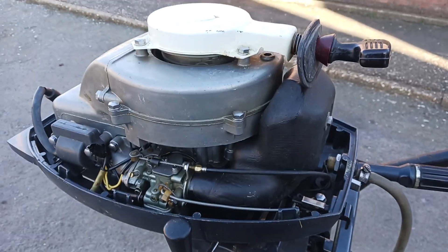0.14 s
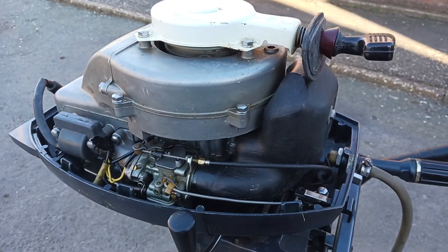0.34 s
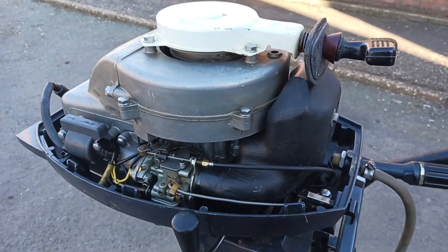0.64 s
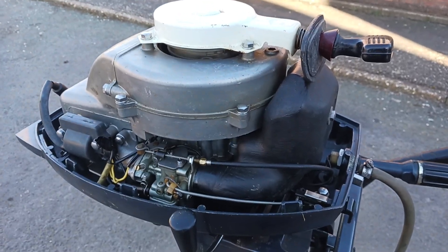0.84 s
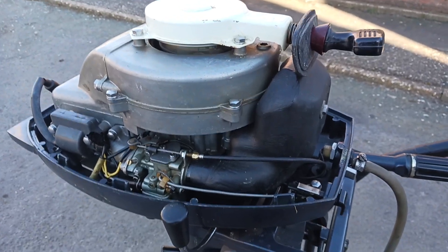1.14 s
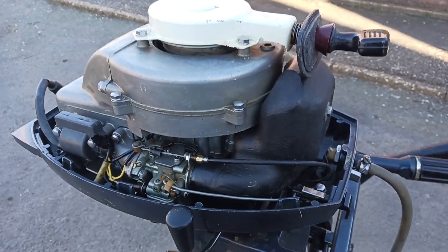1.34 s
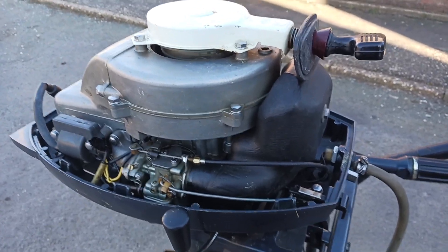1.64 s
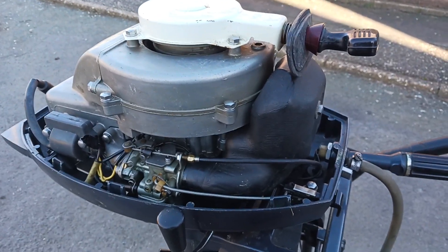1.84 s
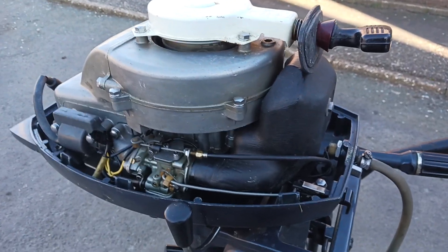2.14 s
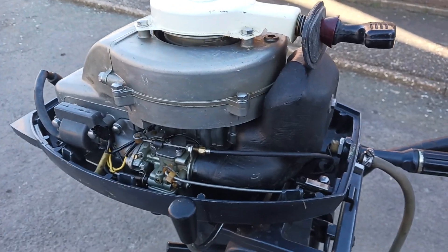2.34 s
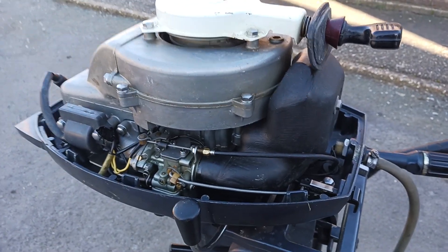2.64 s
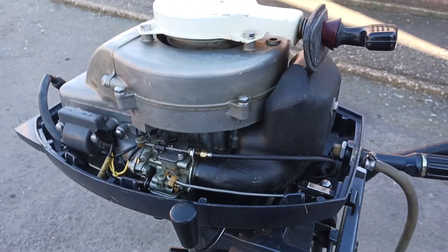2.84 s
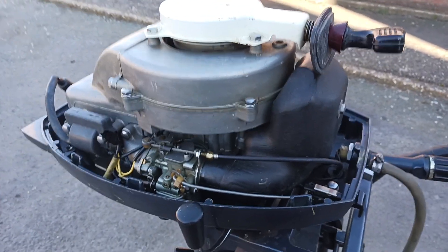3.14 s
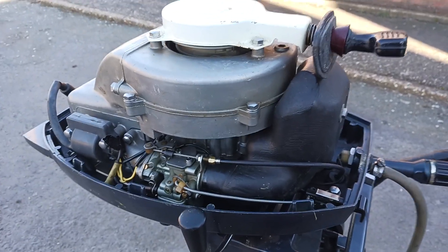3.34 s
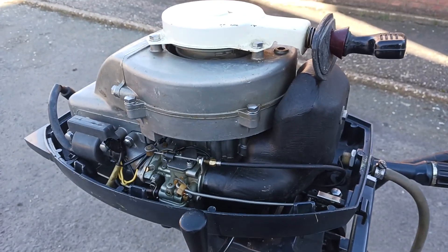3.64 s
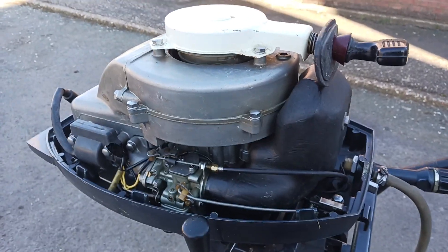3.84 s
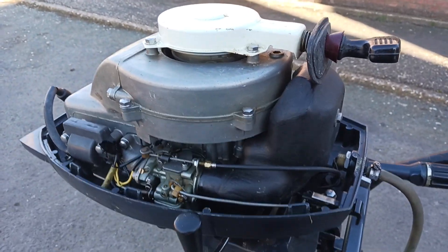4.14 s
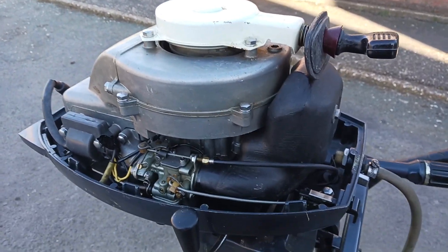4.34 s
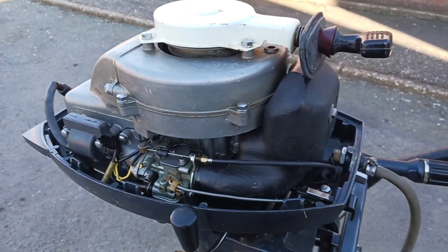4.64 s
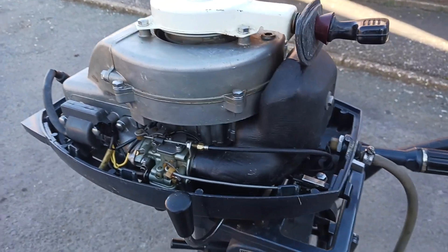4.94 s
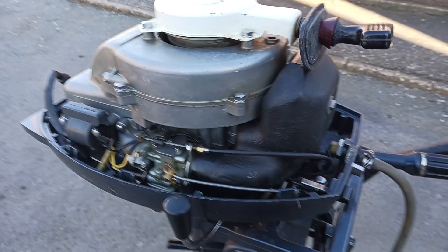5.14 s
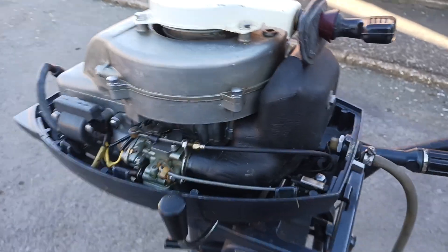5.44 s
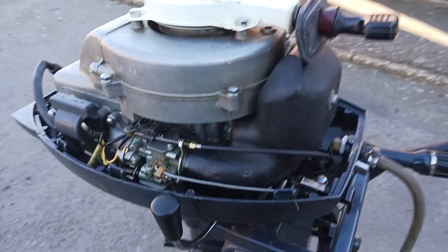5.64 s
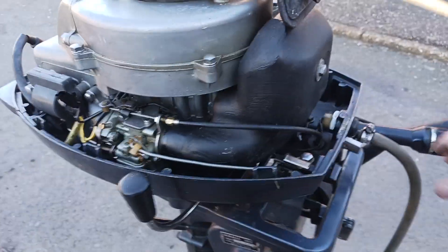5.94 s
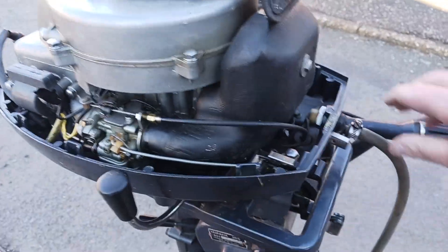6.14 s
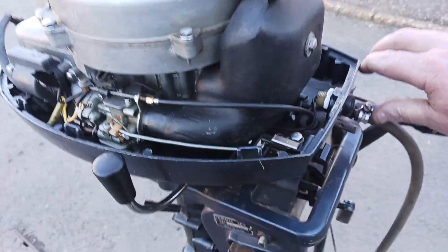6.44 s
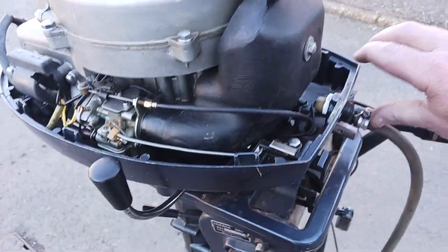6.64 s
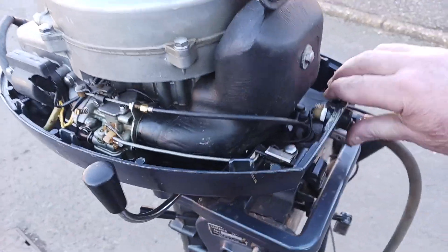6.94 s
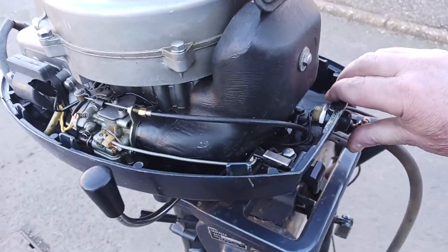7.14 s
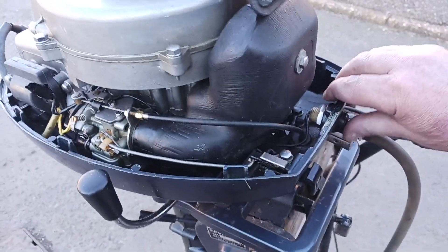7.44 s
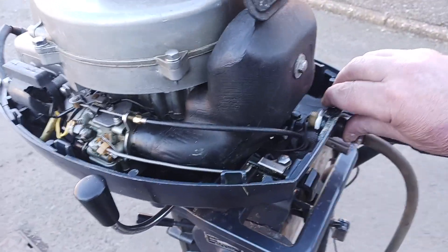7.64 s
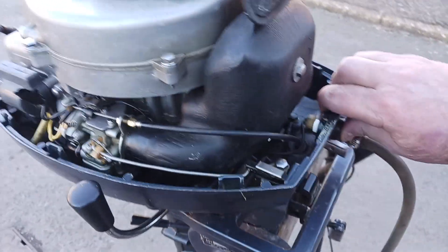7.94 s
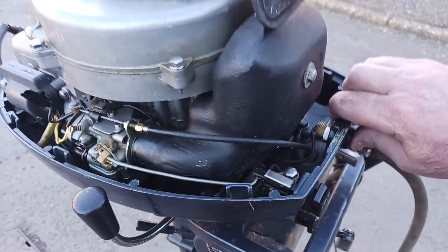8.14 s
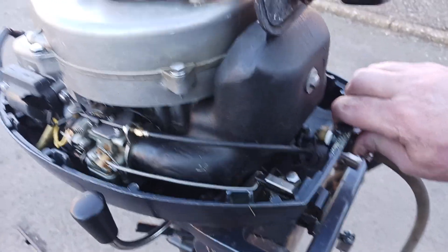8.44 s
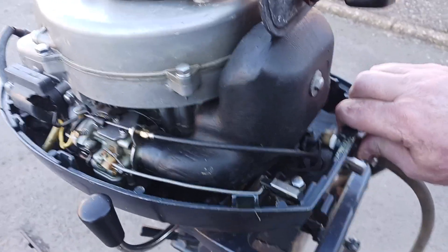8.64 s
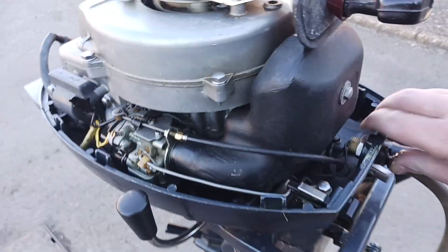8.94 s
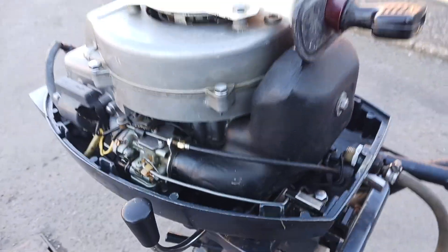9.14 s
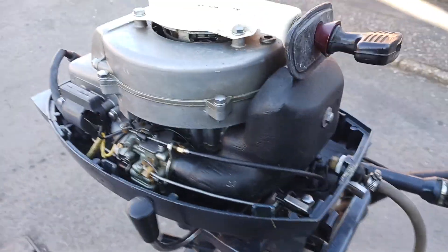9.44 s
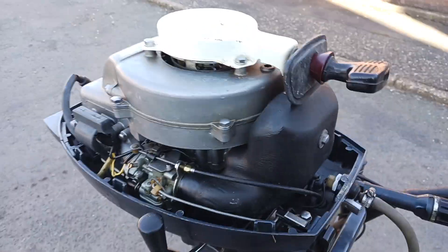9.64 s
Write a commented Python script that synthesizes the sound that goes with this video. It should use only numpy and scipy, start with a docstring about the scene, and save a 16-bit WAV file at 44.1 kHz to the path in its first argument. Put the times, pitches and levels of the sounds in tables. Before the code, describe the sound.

A small uncovered outboard motor idles unevenly with sharp, stuttering barks over thudding and metallic whirr, then stops, coasting down to knocks and buffeting wind.

```python
"""Two-stroke outboard idling and stopping

A small single-cylinder outboard with its cover off turns about 35 times a second on a stand outdoors.
It fires mostly every four to six turns, at times stuttering: ringing modes and noise bursts make sharp
barks over a thudding intake (pressure pulses locked to the crank) and a metallic whirr (resonant noise).
The microphone moves closer, the motor is stopped and coasts down with a few last knocks;
wind noise and short pops then buffet the left port."""
import sys
import numpy as np
from scipy import signal
from scipy.fft import rfft, irfft
from scipy.io import wavfile
from scipy.ndimage import uniform_filter1d

SR = 44100
rng = np.random.default_rng(int(sys.argv[2]) if len(sys.argv) > 2 else 0)


def file_out(sig):
    """Save sig as 16-bit WAV at sys.argv[1]."""
    # one column per channel
    cols = np.atleast_2d(sig).T
    # limit, then scale
    lim = np.clip(cols, -1, 1)
    pcm = np.round(lim * 32767).astype(np.int16)
    wavfile.write(sys.argv[1], SR, pcm)


N = 431296
TIME_S = np.arange(N) / SR
BINS_HZ = np.maximum(np.arange(N // 2 + 1) * SR / N, 1)

# full firings: start_s, crack_db
FIRINGS = [(0.11, -10.5), (0.2503, -13.5), (0.3904, -15.5), (0.5342, -17), (0.6466, -18.5), (0.8157, -23),
           (0.9585, -16.5), (1.1014, -14.5), (1.2451, -12.5), (1.3573, -24), (1.4726, -15.5),
           (1.5878, -16.5), (1.6441, -19), (1.7566, -14.5), (1.8997, -17), (2.013, -15.5), (2.1273, -14),
           (2.2707, -16), (2.4112, -15), (2.526, -22), (2.6965, -14.5), (2.8346, -18), (2.9466, -19),
           (3.1167, -19), (3.2609, -14), (3.4037, -12.5), (3.5196, -15), (3.6076, -18.5), (3.7839, -13),
           (3.924, -15.5), (4.0421, -14), (4.2147, -14), (4.3582, -15.5), (4.4997, -14), (4.6459, -10),
           (4.788, -18.5), (4.9024, -11), (5.0424, -21), (5.1834, -13.5), (5.3253, -18.5), (5.469, -14),
           (5.6435, -18), (5.7882, -18), (5.904, -16.5), (6.0224, -19), (6.1685, -14), (6.2861, -18),
           (6.4287, -10.5), (6.5452, -12.5), (6.6877, -16.5), (6.86, -22), (7.0029, -17), (7.1714, -21.5),
           (7.3169, -15), (7.464, -16.5), (7.6076, -12.5), (7.7235, -16.5), (7.8407, -15.5), (7.9572, -16)]
# partial burns in a turn next to a full firing, dull with little crack: start_s, bark_db
STUTTERS = [(.7885, -16.5), (.929, -18.5), (1.273, -20.5), (1.985, -17), (2.241, -19.5), (2.383, -17.5),
            (2.5554, -16), (2.6667, -22.5), (4.386, -21.5), (4.928, -18.5), (5.154, -20), (5.351, -24.5),
            (6.256, -20.5), (7.143, -16)]
# crank speed after the last firing: time_s, turns_per_s
COAST = [(7.96, 35), (8.09, 32), (8.19, 28.3), (8.31, 23.2), (8.46, 17.3), (8.6, 11.3), (8.7, 8.4),
         (8.85, 4), (8.95, 0)]
# nearness of the microphone: time_s, closeness_0_to_1
CLOSENESS = [(0, 0.31), (4.4, 0.33), (5.4, 0.55), (6.2, 0.87), (9.7, 0.8)]
# exhaust and casing modes rung by a firing: pitch_hz, relative_db, t60_s, left_minus_right_db
BARK_MODES = [(66.4, -41.5, 0.35, 3), (165.8, -20.5, 0.055, -5.5), (245, -33.5, 0.0063, -7.5),
              (448.3, -14.5, 0.042, -1), (527, -15, 0.023, -11), (573.6, -33, 0.22, 0),
              (738, -18, 0.2, -2.5), (850, -12.5, .003, 0), (1011, -24, 0.087, 7.5),
              (1247, -24, 0.055, 14.5), (1396, -16, 0.058, -1.5), (1683, -13, 0.045, 7),
              (2175, -42, .03, -3.5), (2901, -27, 0.054, 32), (4103, -18, 0.018, 8)]
# casing resonances from above and from close by: centre_hz, width_hz (before spread), relative_db
CASING_ABOVE = [(1231, 8.8, -2.5), (1853, 400, 0), (2126, 85, 0), (2673, 290, -5.5), (3230, 40, -7.5),
                (3426, 23, -5), (3790, 280, -13), (6170, 330, -21.5), (6720, 100, -21.5), (7220, 240, -27)]
CASING_CLOSE = [(946, 44, -11.5), (1489, 100, 4), (1888, 206, -1.5), (2160, 90, 1.5), (2563, 130, -6.5),
                (3896, 140, -13), (4160, 135, -19), (7250, 130, -23)]
# relative spectra of churned air, running hiss, exhaust blast and rubbing: freq_hz, density_db_per_hz
CHURN = [(30, -31), (60, -3), (110, -3.5), (240, -1.5), (340, -7), (450, -1), (600, -4), (830, -11),
         (1200, -4), (1800, -6), (3000, -5.5), (4500, -26), (6500, -50.5)]
HISS = [(1500, -19.5), (3000, -14), (4300, 9.5), (5400, -2.5), (7400, -3.5), (9000, -7.5), (10300, -10),
        (12000, -4), (13500, -9), (16000, -8.5)]
BLAST = [(600, 4.5), (1500, 6.5), (3000, -31.5), (4300, -2.5), (5400, -1.5), (7500, -4), (10000, -8),
         (12700, -5), (16000, -6.5)]
RUBBING = [(40, -18), (300, -2.5), (500, -2), (700, 1), (1050, -3.5), (1500, -15.5), (5000, -36),
           (9500, -38.5), (12000, -21.5), (16000, -22.5)]
# relative spectra of steady wind, a buffet and the quiet yard: freq_hz, density_db_per_hz
WIND = [(20, -11), (60, 6), (130, -1), (250, -8), (450, -22), (800, -41.5), (1500, -47), (3000, -65),
        (8000, -77)]
BUFFET = [(20, -8.5), (60, 3.5), (150, -1), (400, -0.5), (600, -7.5), (900, -22), (1600, -35), (2300, -50),
          (3200, -65), (8000, -69)]
OUTDOORS = [(40, -12), (120, 5.5), (280, -20), (520, -19), (1100, -21), (2400, -24), (3200, -42),
            (6000, -33.5), (15000, -43)]
# level balance of the two microphone ports: freq_hz, left_minus_right_db
PORT_BALANCE = [(60, 4.5), (110, -3.5), (200, -2), (380, -1), (700, 1), (1290, 4.5), (2380, 7.5), (4400, 6),
                (8120, 9.5), (15000, 10.5)]
# phase between the ports: freq_hz, left_lead_rad
PORT_PHASE = [(50, 0.87), (400, 0.45), (1120, 1.82), (1500, 1.76), (2070, 0.5), (2410, 0.52), (3000, 4.97),
              (3800, 5.32), (5000, 1.4), (16000, 1.2)]
# correlation of the ports: freq_hz, likeness_0_to_1
PORT_LIKENESS = [(40, .4), (150, .93), (700, .94), (2000, .9), (5000, .45), (16000, .35)]
# knocks as the crank rocks to rest: start_s, ring_db, body_db, edge_db
KNOCKS = [(8.613, -27, -33, -48), (8.718, -33, -40, -54), (8.781, -38, -48, -53), (8.86, -30.5, -33, -44),
          (8.973, -39.5, -51, -74), (9.066, -53, -61, -90)]
# faint thin ticks of very high noise: start_s, level_db
TICKS = [(8.275, -38), (8.333, -43), (8.411, -40), (8.473, -45), (9.546, -55)]
# gusts on the ports: crest_s, half_length_s, left_db, right_db
GUSTS = [(1.147, 0.08, -37, -23), (1.55, 0.25, -30, -30), (1.664, .04, -39, -29), (1.858, 0.025, -40, -20),
         (2.003, .035, -33.5, -17.5), (2.113, 0.036, -45, -23), (2.5, .25, -45, -36),
         (8.515, 0.28, -31.5, -39), (8.963, .05, -29, -47), (9.154, .07, -28, -60.5),
         (9.31, 0.032, -24, -49), (9.498, .11, -19.5, -45.5), (9.75, .08, -49.5, -39)]
# single buffets on the left port: start_s, relative_db
BUFFETS = [(9.094, -32.5), (9.142, -28), (9.189, -34), (9.209, -30.5), (9.264, -20), (9.326, -20.5),
           (9.388, -14.5), (9.413, -10.5), (9.464, -7.5), (9.541, -9.5), (9.554, -12), (9.586, -15.5)]

IDLE_TURNS_PER_S = 35
LAST_FIRING_S = FIRINGS[-1][0]
# bark of a usual firing; share of the crack's swing in dB that it follows
USUAL_CRACK_DB, BARK_DB, BARK_FOLLOWS = -14, -16.5, 0.25
# a wait this long begins with an afterburn, one turn after the firing, that fouls the cylinder
FOULED_WAIT_TURNS = 6
AFTERBURN_DB, AFTERBURN_SCATTER_DB = -18, 0.5
PARTIAL_CRACK_DB = -9  # stutter or afterburn, relative to its bark
# base levels at idle and the power of crank speed each follows
WHIRR_DB, WHIRR_POWER = -18.5, 1.79
HISS_DB, HISS_POWER = -34, 1.54
PUMPING_DB, PUMPING_POWER = -18.5, 0.32
DRAG_DB, DRAG_POWER = -23.5, 1.42
# once nothing fires, the slack drive rattles a little louder
OVERRUN_DB, OVERRUN_RISE_S = 1, 0.091
STILL_AIR_DB, OUTDOORS_DB = -56.5, -58.5
CUTOFF_HZ = 16000


def from_db(db):
    """Decibels to gain."""
    return 10 ** (np.asarray(db) / 20)


def rms_one(x):
    """Scale to rms 1."""
    return x / np.sqrt(np.mean(x ** 2) + 1e-20)


def in_time(curve):
    """A (time_s, value) curve at every sample."""
    time_s, value = np.transpose(curve)
    return np.interp(TIME_S, time_s, value)


def per_bin(points):
    """A table over log frequency at every bin."""
    hz, value = np.transpose(points)
    return np.interp(np.log(BINS_HZ), np.log(hz), value)


def spectrum(points):
    """Gain at every bin from a table in dB."""
    return from_db(per_bin(points))


def clicks(times_s, sizes):
    """One impulse at each time."""
    samples = np.clip(np.round(times_s * SR).astype(int), 0, N - 1)
    return np.bincount(samples, sizes, N) + 1e-18


def delayed(x, delay_s):
    """The same sound, later."""
    return np.interp(TIME_S - delay_s, TIME_S, x, left=0)


def ring(x, hz, t60_s):
    """Two-pole resonator: a unit click rings a decaying sine that starts at height 1."""
    radius = from_db(-60 / (t60_s * SR))
    step_rad = 2 * np.pi * hz / SR
    feedback = [1, -2 * radius * np.cos(step_rad), radius ** 2]
    return signal.lfilter([0, np.sin(step_rad)], feedback, x)


def fading(x, t60_s):
    """Each click becomes an exponential decay."""
    return signal.lfilter([1], [1, -from_db(-60 / (t60_s * SR))], x)


def noise(gain, drive=1):
    """Mono noise, scaled by drive, then coloured by gain; rms 1 at drive 1."""
    return irfft(rfft(rng.standard_normal(N) * drive) * rms_one(gain), N)


def at_ports(gain, drive=1):
    """Turbulence scaled by drive and coloured by gain, partly shared by the two ports; rms 1."""
    shared, own = rfft(rng.standard_normal((2, N)) * drive)
    alike = np.clip(per_bin(PORT_LIKENESS), 0, 1)
    lean = from_db(per_bin(PORT_BALANCE) / 2)
    right = alike * shared + np.sqrt(1 - alike ** 2) * own
    right = right * np.exp(-1j * per_bin(PORT_PHASE))
    return rms_one(irfft(np.array([shared * lean, right / lean]) * gain, N))


def resonances(peaks, spread):
    """Gain of steep-sided resonances summed in power."""
    power = 0
    for hz, width_hz, db in peaks:
        offset = (BINS_HZ - hz) / (spread * width_hz)
        power = power + from_db(db) ** 2 / (1 + offset ** 2) ** 2
    return np.sqrt(power)


def crank_turns():
    """Crank angle in turns: whole turns lie between firings, then the flywheel coasts."""
    fired_s = np.array(FIRINGS)[:, 0]
    whole = np.concatenate([[0], np.cumsum(np.round(np.diff(fired_s) * IDLE_TURNS_PER_S))])
    before = np.minimum(TIME_S - fired_s[0], 0) * IDLE_TURNS_PER_S
    coast_turns_per_s = np.maximum(in_time(COAST), 0) * (TIME_S > LAST_FIRING_S)
    return np.interp(TIME_S, fired_s, whole) + before + np.cumsum(coast_turns_per_s) / SR


def crank_speed(turns):
    """Crank speed as a share of idle."""
    return np.maximum(np.gradient(turns) * SR / IDLE_TURNS_PER_S, 1e-6)


def burns():
    """Every combustion as (start_s, bark_db, crack_db): full firings, afterburns and stutters."""
    full_s, crack_db = np.transpose(FIRINGS)
    wait_turns = np.round(np.diff(full_s) * IDLE_TURNS_PER_S)
    one_turn_later_s = full_s[:-1] + np.diff(full_s) / wait_turns
    after_s = one_turn_later_s[wait_turns >= FOULED_WAIT_TURNS]
    after_db = AFTERBURN_DB + AFTERBURN_SCATTER_DB * rng.standard_normal(len(after_s))
    partial_s, partial_db = np.hstack([[after_s, after_db], np.transpose(STUTTERS)])
    full_db = BARK_DB + BARK_FOLLOWS * (crack_db - USUAL_CRACK_DB)
    partial = [partial_s, partial_db, partial_db + PARTIAL_CRACK_DB]
    return np.hstack([[full_s, full_db, crack_db], partial])


def barks(combustions, level_db=14, scatter_db=1.0, echo_s=0.00468, echo=0.43, lead_s=0.00018):
    """Each burn kicks the exhaust and casing modes; the ground throws the kick back."""
    start_s, bark_db, _ = combustions
    left, right = np.zeros((2, N))
    for hz, db, t60_s, lean_db in BARK_MODES:
        kick_db = bark_db + level_db + db + scatter_db * rng.standard_normal(len(start_s))
        mode = ring(clicks(start_s - 0.0008, from_db(kick_db)), hz, t60_s)
        left = left + mode * from_db(lean_db / 2)
        right = right + mode * from_db(-lean_db / 2)
    direct = [left, delayed(right, lead_s)]
    return np.array([side + echo * delayed(side, echo_s) for side in direct])


def blasts(combustions, opening_db=-13, spit_db=0, tail_db=-17):
    """Gas cracks out as the port opens, spits hardest just after, and dies away."""
    start_s, bark_db, crack_db = combustions
    opening = clicks(start_s - 0.0002, from_db(bark_db + opening_db))
    spit = clicks(start_s + 0.00067, from_db(crack_db + spit_db))
    envelope = fading(opening, t60_s=0.037) + fading(spit, t60_s=0.014)
    envelope = envelope + from_db(tail_db) * fading(spit, t60_s=0.05)
    # the port takes about a millisecond to open
    return uniform_filter1d(envelope, size=50) * at_ports(spectrum(BLAST))


def intake(turns, gulp_hz=185, echo=0.2, echo_s=0.012, lag_turns=0.031, sway_db=-41):
    """The piston draws a gulp of air each turn, longer as the crank slows; reversals sway the casing."""
    speed = crank_speed(turns)
    stroke = np.round(turns - turns[0] // 1).astype(int)
    chance = rng.standard_normal((stroke.max() + 1, 2))[stroke]
    late_turns, scatter_db = 0.006 * chance[:, 0], 1.2 * chance[:, 1]
    angle_turns = turns - np.round(turns) - lag_turns - late_turns
    # a short dip in pressure between two weak crests
    u = (np.pi * gulp_hz * angle_turns / IDLE_TURNS_PER_S) ** 2 / speed
    pulse = (2 * u - 1) * np.exp(-u)
    turning = np.clip(speed * 10, 0, 1)
    gulp = pulse * from_db(PUMPING_DB + scatter_db) * speed ** PUMPING_POWER * turning
    # a nearby wall returns each gulp
    gulp = gulp + echo * delayed(gulp, echo_s)
    sway = from_db(sway_db) * speed ** 2 * np.sin(4 * np.pi * turns)
    return np.array([gulp * from_db(-3.5), delayed(gulp, 0.00006)]) + sway


def running_gear(turns, whirr_trim_db=-1, hiss_trim_db=2, churn_db=-12, churn_follow=0.69,
                 slap=0.054, slap_turns=0.34, throb=0.033, throb_turns=0.05, surge=0.34, grain_db=1.5):
    """Gears and piston rattle the casing, swelling twice a turn; the flywheel churns air."""
    speed_db = 20 * np.log10(crank_speed(turns))
    slack_db = OVERRUN_DB * np.clip((TIME_S - LAST_FIRING_S) / OVERRUN_RISE_S, 0, 1)
    whirr_db = WHIRR_DB + WHIRR_POWER * speed_db + slack_db
    hiss_db = HISS_DB + HISS_POWER * speed_db
    fired_s = np.array(FIRINGS)[:, 0]
    load = 1 + surge * fading(clicks(fired_s, np.ones(len(fired_s))), t60_s=0.14)
    teeth = from_db(grain_db * noise(1 / (1 + (BINS_HZ / 250) ** 2)))
    twice_a_turn = slap * np.cos(4 * np.pi * (turns - slap_turns))
    once_a_turn = throb * np.cos(2 * np.pi * (turns - throb_turns))
    drive = load * teeth * (1 + twice_a_turn + once_a_turn)
    close = np.clip(in_time(CLOSENESS), 0, 1)
    casing = np.sqrt(1 - close) * at_ports(resonances(CASING_ABOVE, spread=0.56), drive)
    casing += np.sqrt(close) * at_ports(resonances(CASING_CLOSE, spread=0.66), drive)
    # the dull churning outlasts the bright rattle as the crank slows
    churn = from_db(churn_db + churn_follow * whirr_db) * at_ports(spectrum(CHURN), drive)
    hiss = from_db(hiss_db + hiss_trim_db) * at_ports(spectrum(HISS), drive)
    return from_db(whirr_db + whirr_trim_db) * casing + churn + hiss


def drag(turns, catch=0.31, catch_turns=0.1):
    """Seals rub hardest once a turn; below idle the oil film thins, and rubbing ends with the motion."""
    speed = crank_speed(turns)
    thinning = np.clip(1 - speed, 0, 1) * (TIME_S > LAST_FIRING_S)
    pressure = 1 + catch * np.cos(2 * np.pi * (turns - catch_turns))
    level = from_db(DRAG_DB) * thinning * speed ** DRAG_POWER * pressure
    return level * at_ports(spectrum(RUBBING))


def knocks(dull_hz=2800, attack_s=0.0034):
    """Drive slack closes as the crank hesitates against compression: casing ring, dull body, sharp edge."""
    start_s, ring_db, body_db, edge_db = np.transpose(KNOCKS)

    def swell(db, t60_s):
        """Decays with a short ramped attack."""
        decay = fading(clicks(start_s + attack_s / 2, from_db(db)), t60_s)
        return uniform_filter1d(decay, int(attack_s * SR) + 1)

    ring_gain = resonances(CASING_CLOSE, spread=2.9) / np.sqrt(1 + (BINS_HZ / dull_hz) ** 6)
    ringing = swell(ring_db, t60_s=0.092) * at_ports(ring_gain)
    body = swell(body_db, t60_s=0.084) * at_ports(spectrum(RUBBING) * (BINS_HZ < dull_hz))
    edge = swell(edge_db, t60_s=0.065) * at_ports(spectrum(HISS))
    return ringing + body + edge


def ticks(low_hz=11000, high_hz=15800, t60_s=0.05):
    """Faint decaying bursts of very high noise."""
    start_s, db = np.transpose(TICKS)
    band = 1.0 * ((BINS_HZ > low_hz) & (BINS_HZ < high_hz))
    return fading(clicks(start_s, from_db(db)), t60_s) * at_ports(band)


def gust_force():
    """Wind strength at each port: bell-shaped gusts over almost still air."""
    force = from_db(STILL_AIR_DB)
    for crest_s, half_s, left_db, right_db in GUSTS:
        bell = np.exp(-((TIME_S - crest_s) / half_s) ** 2)
        force = force + from_db([[left_db], [right_db]]) * bell
    return force


def wind(buffet_db=-7, pop_db=-1, pop_hz=270, snap_db=3, snap_hz=1600, small_per_s=70, small_db=5):
    """Turbulence differs at each port; eddies pop on the left, small ones at random with its wind."""
    start_s, db = np.transpose(BUFFETS)
    forces = gust_force()
    left, right = [noise(spectrum(WIND), force) for force in forces]
    hits = clicks(start_s, from_db(db))
    eddies = from_db(buffet_db) * noise(spectrum(BUFFET), fading(hits, t60_s=0.089))
    small = rng.uniform(-1, 1, N) * (rng.random(N) < small_per_s / SR)
    hits = hits + from_db(small_db) * forces[0] * small
    snaps = from_db(pop_db) * ring(hits, pop_hz, t60_s=0.009) + from_db(snap_db) * hits
    pops = signal.sosfilt(signal.butter(6, snap_hz, fs=SR, output="sos"), snaps)
    return np.array([left + eddies + pops, right])


def yard():
    """Quiet outdoor noise, independent at each port."""
    return from_db(OUTDOORS_DB) * np.array([noise(spectrum(OUTDOORS)) for side in range(2)])


def scene(close_lean_db=2):
    """The motor, its running gear further left when close; the wind and a quiet yard."""
    turns, combustions = crank_turns(), burns()
    lean_db = close_lean_db * (in_time(CLOSENESS) - 0.5) / 2
    lean = from_db(lean_db * np.array([[1], [-1]]))
    firing = barks(combustions) + blasts(combustions)
    turning = intake(turns) + lean * running_gear(turns) + drag(turns)
    return firing + turning + knocks() + ticks() + wind() + yard()


def record(dry):
    """The deepest bass and the top are cut; the highest peaks are rounded."""
    thin = signal.sosfilt(signal.butter(6, 39, "high", fs=SR, output="sos"), dry)
    held = thin / (1 + (thin / 0.9) ** 6) ** (1 / 6)
    return signal.sosfilt(signal.ellip(12, 0.1, 80, CUTOFF_HZ, fs=SR, output="sos"), held)


dry = scene()
out = record(dry)
file_out(out)
```